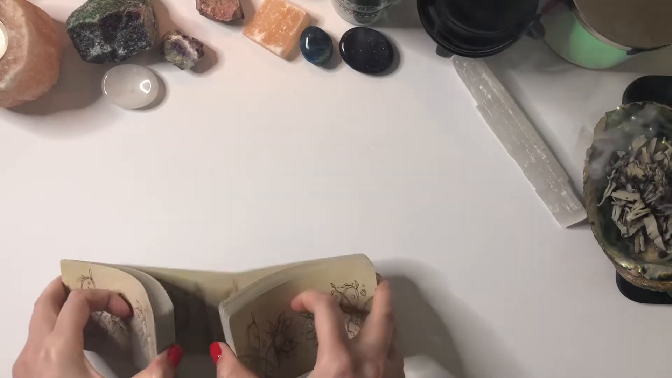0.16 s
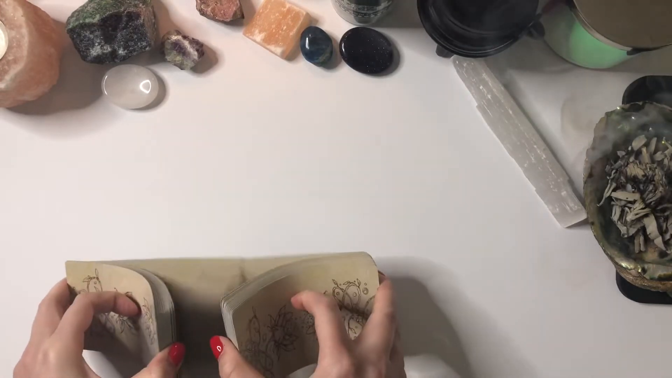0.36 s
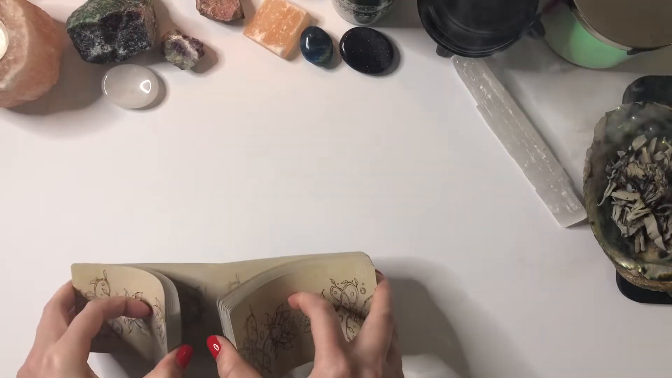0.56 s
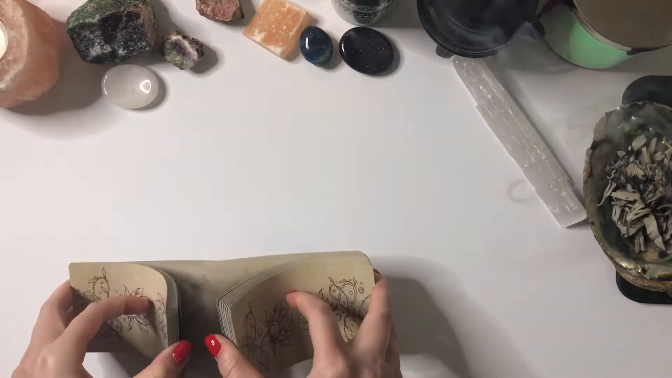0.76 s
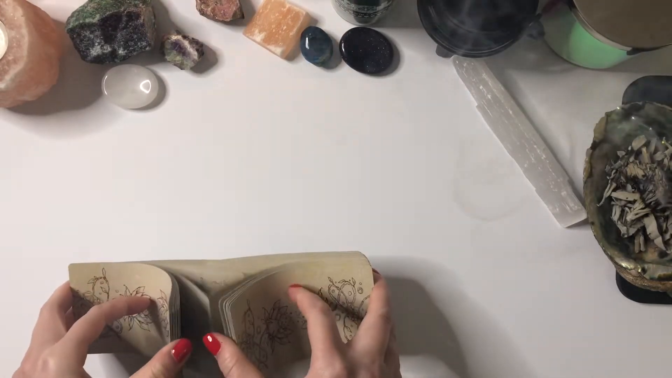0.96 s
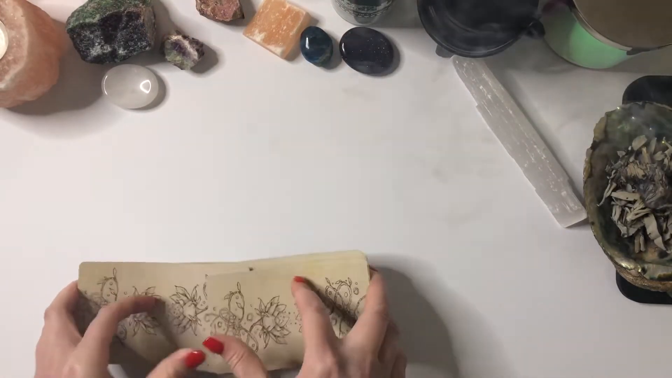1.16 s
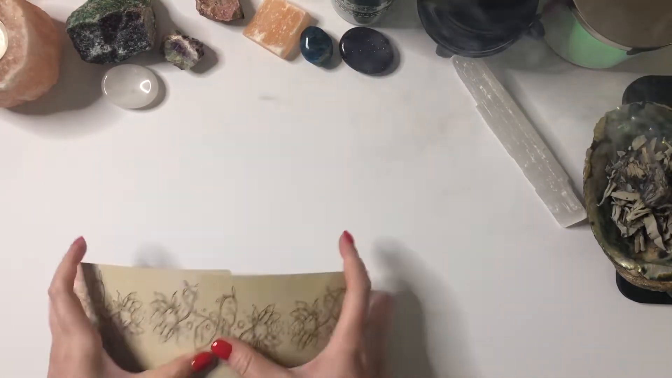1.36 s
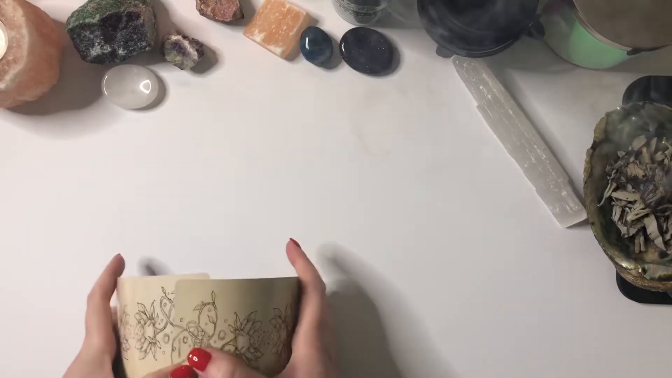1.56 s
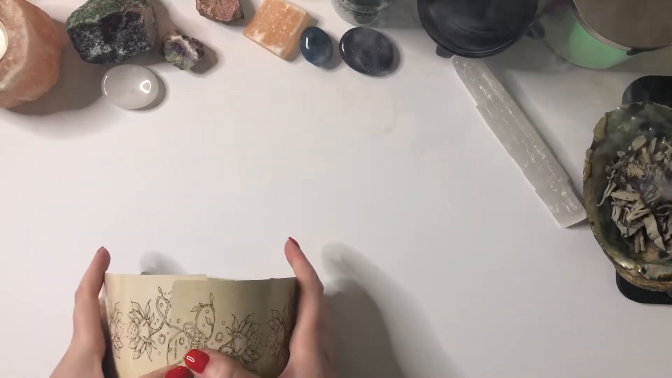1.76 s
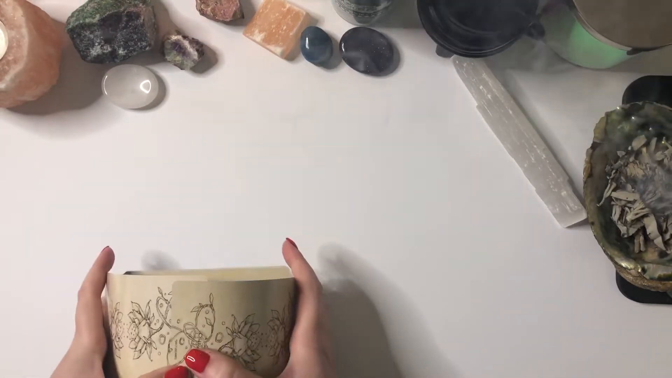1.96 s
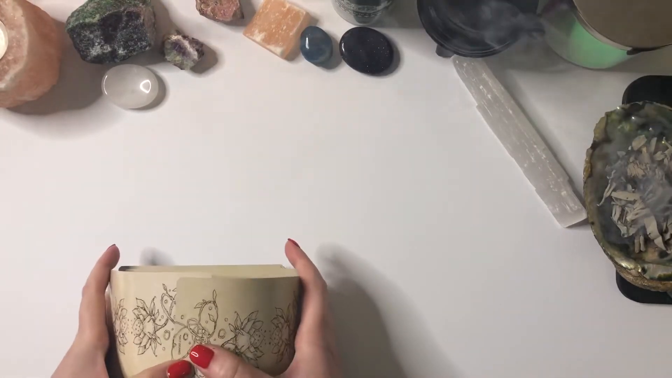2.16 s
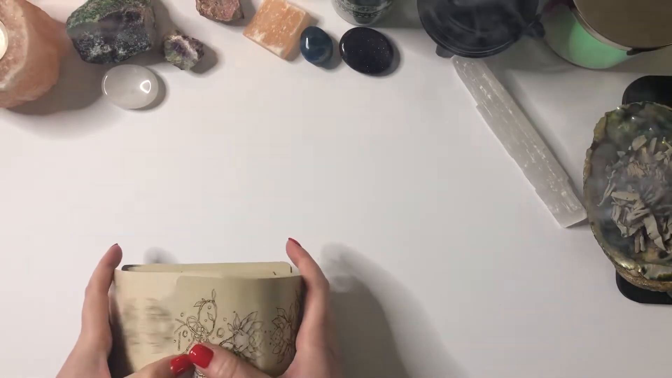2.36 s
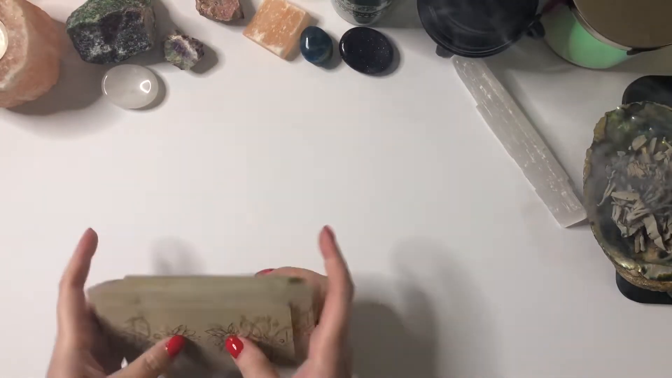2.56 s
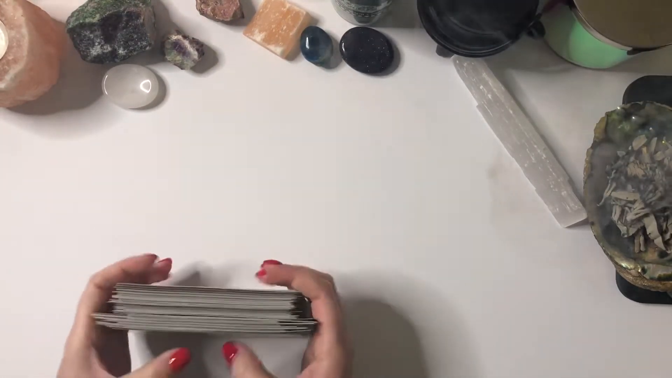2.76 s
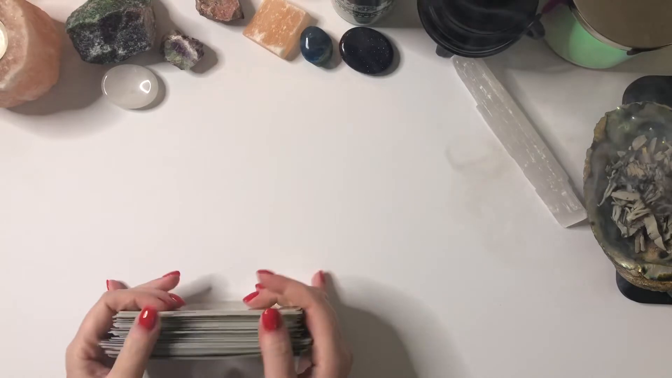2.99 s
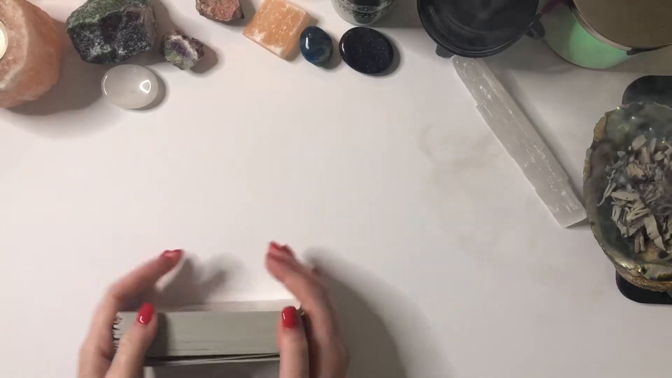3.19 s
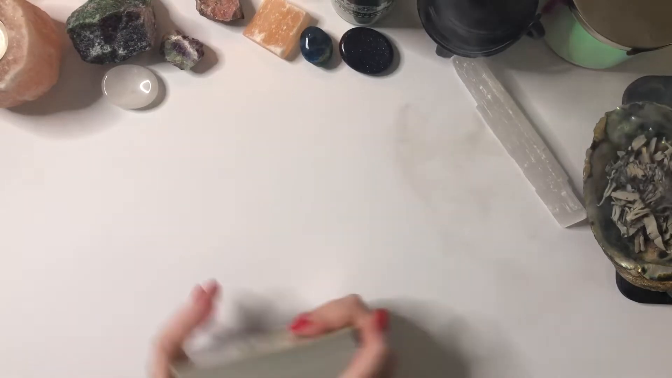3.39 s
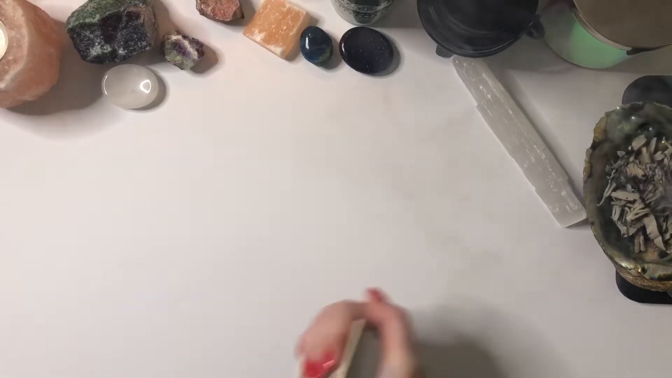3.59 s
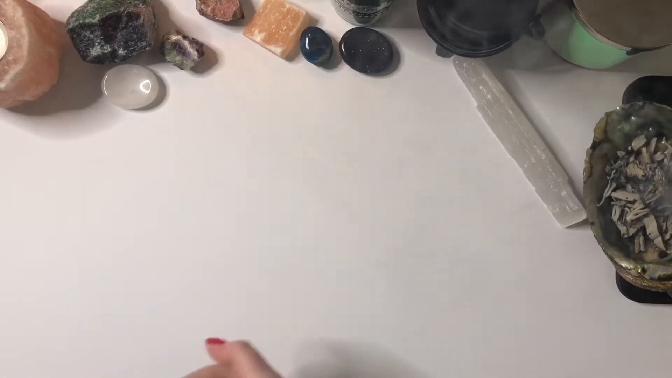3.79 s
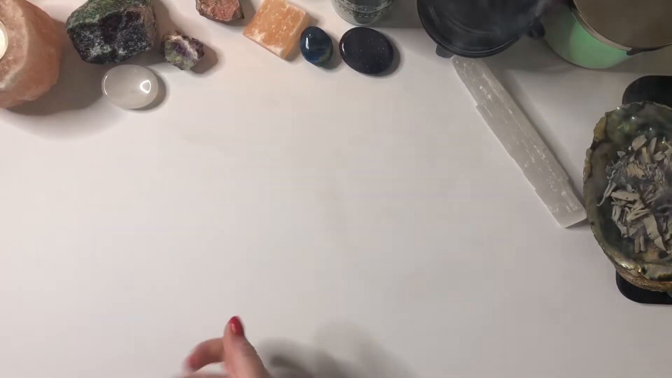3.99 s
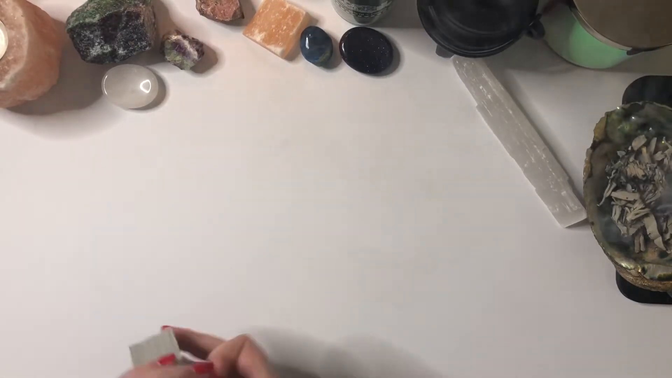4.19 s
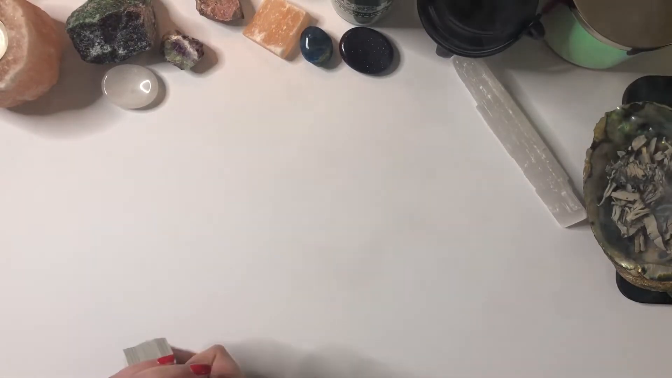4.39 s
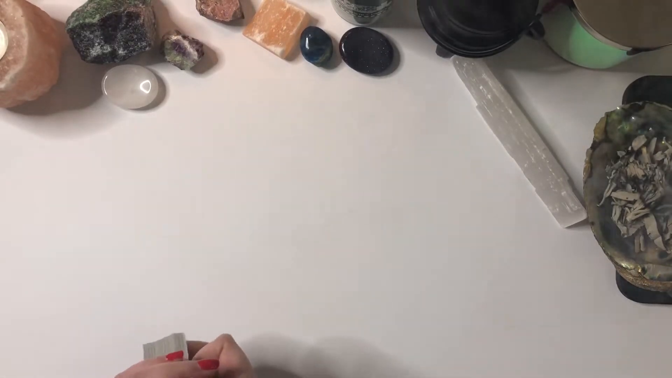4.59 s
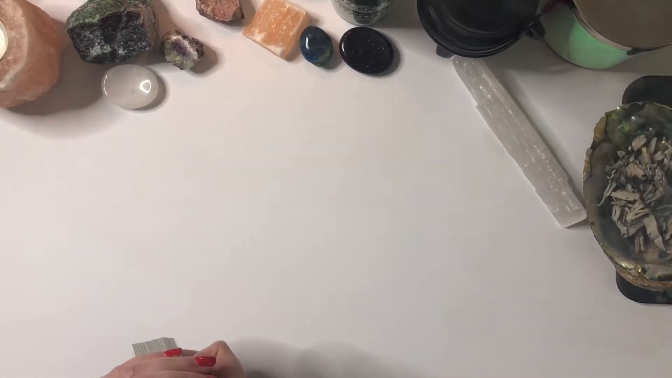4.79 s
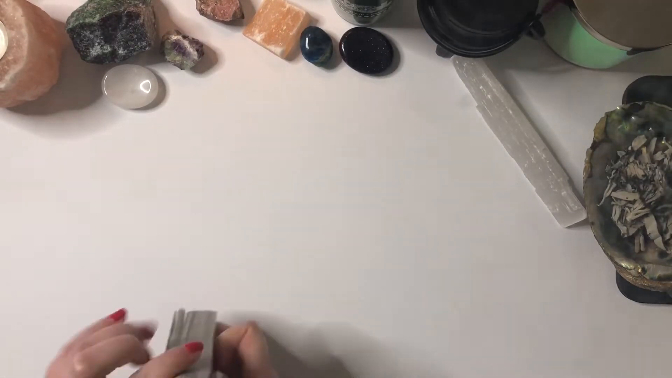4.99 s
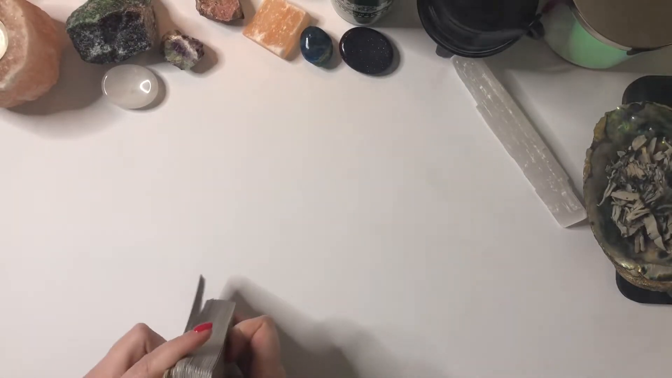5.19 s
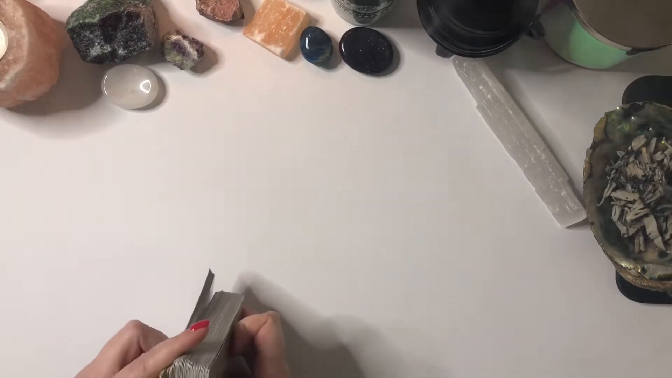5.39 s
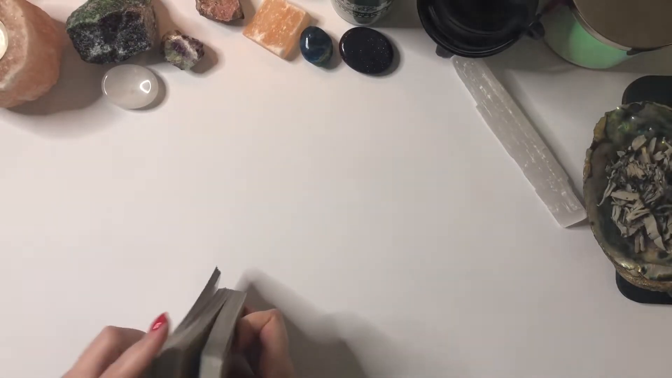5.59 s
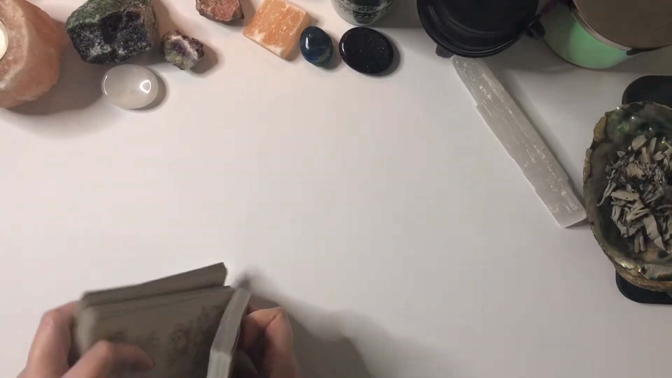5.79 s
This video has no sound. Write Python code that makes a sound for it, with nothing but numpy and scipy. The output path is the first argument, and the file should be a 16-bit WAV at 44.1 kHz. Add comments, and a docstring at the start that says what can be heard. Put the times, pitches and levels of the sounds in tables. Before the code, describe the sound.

A deck of cards is shuffled by hand on a hard table: dry ticks and snaps, a quick crackling burst, a brief soft gap, then a hissing papery cascade. The deck's edge drops twice with a dull knock and card clatter. Afterwards it is nearly silent, with tiny brushing and light handling. Close microphone, short room echo, very faint low steady noise.

```python
"""Cards snap off the thumbs, singly and then in a rush: a deck is riffled on a table in a small bare room.
The woven deck is bent into a bridge and slithers together, is dropped twice on its edge to square it,
and after a pause is handled softly and cut again. Contacts are short noise bursts with one broad ring;
slides are grainy friction noise. Table resonances, wall echoes and a faint steady noise lie behind."""
import sys
import numpy as np
from scipy import signal
from scipy.fft import rfft, irfft, next_fast_len
from scipy.io import wavfile

SR = 44100
rng = np.random.default_rng(int(sys.argv[2]) if len(sys.argv) > 2 else 0)


def persist_wave(psi):
    """Save psi, clipped to +-1, as 16-bit WAV."""
    counts = np.round(np.clip(psi, -1, 1) * 32767).astype(np.int16)
    wavfile.write(sys.argv[1], SR, np.atleast_2d(counts).T)


N = 257984

# cards or fingers meet the table: start_s, body_db, crack_db, tick_db, pack_ring_hz (relative levels)
KNOCK_EVENTS = [(0.018, -43, -55, -66.5, 264), (1.437, -40, -56, -73, 312), (1.503, -29, -59, -71.5, 444),
                (1.598, -40.5, -57, -72, 218), (2.7486, -30.5, -31.5, -54.5, 1098),
                (2.7603, -24.5, -35, -59, 350), (2.7808, -30, -25, -35.5, 229.7),
                (2.796, -28.5, -18.5, -31, 1243), (2.805, -19, -17, -27.5, 472),
                (2.820, -20, -21.5, -33.5, 481), (2.946, -34, -31, -58, 312.3),
                (3.001, -36, -45, -75.5, 1200), (3.059, -35, -32, -65, 1273),
                (3.065, -25, -34.5, -54.5, 469), (3.0792, -29.5, -22, -37.5, 1380),
                (3.0845, -23.5, -15, -25, 3300), (3.089, -19.5, -16, -30.5, 484),
                (4.298, -60.5, -71, -75.5, 201), (5.2502, -37.5, -49.5, -66.5, 444),
                (5.281, -48.5, -45, -70, 600), (5.447, -44.5, -52, -76, 237),
                (5.574, -43.5, -62.5, -70.5, 343), (5.693, -42.5, -50.5, -61, 269),
                (5.728, -43, -47, -65.5, 271)]
# bands of body, crack (or rasp) and tick (or hiss): low_hz, high_hz
BAND_EDGES_HZ = [(50, 1000), (1000, 4500), (4500, 18000)]
# spectrum of card sliding on card or skin: freq_hz, density_db_per_hz (relative)
SLIDE_SPECTRUM = [(59, -47), (100, -10), (135, -7), (255, -4), (513, -10), (558, -9.5), (1330, 0),
                  (1550, 3), (2270, -4.5), (3700, -6), (5770, -6.5), (8110, -7.5), (15000, -13),
                  (16000, -22.5)]


def from_db(db):
    """Amplitude ratio of a level in dB."""
    return 10 ** (np.asarray(db) / 20)


def rms_one(x):
    """Scales a signal to rms 1."""
    return x / np.sqrt(np.mean(x ** 2) + 1e-20)


def at_hz(points, hz, axis=1):
    """Reads one column of a table on a log-frequency axis."""
    points = np.array(points)
    return np.interp(np.log(np.maximum(hz, 1)), np.log(points[:, 0]), points[:, axis])


def band(x, edges_hz):
    """Butterworth band-pass."""
    return signal.sosfilt(signal.butter(2, edges_hz, "band", fs=SR, output="sos"), x)


def colour(x, spectrum):
    """Causal (minimum-phase) filter with the given spectrum."""
    n = x.shape[-1]
    size = next_fast_len(n) * 2
    magnitude = from_db(at_hz(spectrum, np.fft.rfftfreq(size, 1 / SR)))
    cepstrum = irfft(np.log(magnitude))
    # folding the cepstrum onto positive time gives minimum phase
    cepstrum[1:size // 2] *= 2
    cepstrum[size // 2 + 1:] = 0
    return irfft(rfft(x, size) * np.exp(rfft(cepstrum)))[..., :n]


def resonance(x, hz, width_hz):
    """Two-pole resonance with gain 1 on top."""
    r = np.exp(-np.pi * width_hz / SR)
    numerator = np.array([1, 0, -1]) * (1 - r * r) / 2
    denominator = [1, -2 * r * np.cos(2 * np.pi * hz / SR), r * r]
    return signal.lfilter(numerator, denominator, x + 1e-18)


def stroke(start_s, length_s, attack_s, release_s):
    """A movement gathers speed up to its start, holds, then dies away."""
    t = np.arange(N) / SR - start_s
    attack = np.clip(1 + t / attack_s, 0, 1)
    return attack * np.exp(-np.maximum(t - length_s, 0) / release_s)


def gains(rows, attack_s, release_s):
    """Gain in time for each dB column of a table of strokes."""
    return sum(np.outer(from_db(dbs), stroke(start_s, length_s, attack_s, release_s))
               for start_s, length_s, *dbs in rows)


def swells(rows):
    """Gain in time of short, rounded swells."""
    t = np.arange(N) / SR
    return sum(from_db(db) * np.exp(-(2 * (t - centre_s) / width_s) ** 2) for centre_s, width_s, db in rows)


def contacts(rows, base_decay_s, spectrum, rise, evenness, stretches, offsets_db, ring_db):
    """Each contact is a burst of paper noise a millisecond or so long; its bending body dies more slowly."""
    size, ring_q = 2048, 3.5
    rows, t = np.array(rows), np.arange(size) / SR
    noise = rng.standard_normal((len(rows), 3, size))
    # the free length of card sets one broad resonance
    ratio = np.maximum(np.fft.rfftfreq(size, 1 / SR), 1) / rows[:, -1:]
    ring = 1 + from_db(ring_db) / (1 + 1j * ring_q * (ratio - 1 / ratio))
    out, span = np.zeros(N + size), 5 * SR / 1000
    for k, stretch in enumerate(stretches):
        decay_s = base_decay_s * stretch
        shape = (1 - np.exp(-t / (rise * decay_s))) * np.exp(-t / decay_s)
        # partly even out the noise partials, so that each burst varies less by chance
        partials = rfft(noise[:, k] * shape)
        evened = partials / abs(partials) ** evenness
        bursts = irfft(ring * evened) * np.exp(-(t / (6 * decay_s)) ** 2)
        bursts = band(colour(bursts, spectrum), BAND_EDGES_HZ[k])
        bursts /= np.sqrt(np.sum(bursts ** 2, axis=1, keepdims=True) / span)  # energy of 5 ms at rms 1
        for start_s, db, burst in zip(rows[:, 0], rows[:, 1 + k], bursts):
            i = int(np.clip(start_s * SR, 0, N - 1))
            out[i:i + size] += from_db(db + offsets_db[k]) * burst
    return out[:N]


def one_by_one(runs, count=56):
    """Cards go at uneven gaps, each with its own strength and ring; those after the end of a run are silent."""
    gap_spread_log, strength_spread_db = 0.45, 5.5
    ring_low_hz, ring_high_hz = 1200, 4550
    out = []
    for start_s, end_s, per_s, *dbs in runs:
        luck = np.clip(rng.standard_normal((count, 2)), -2, 2)
        gaps_s = np.exp(gap_spread_log * luck[:, 0]) / per_s
        times_s = start_s + np.cumsum(gaps_s) - gaps_s[0]
        levels_db = np.array(dbs) + strength_spread_db * luck[:, 1:2]
        levels_db[times_s > end_s] = -np.inf
        ring_hz = ring_low_hz * (ring_high_hz / ring_low_hz) ** rng.random(count)
        out.extend(np.column_stack([times_s, levels_db, ring_hz]))
    return out


def card_snaps(rows, base_decay_s):
    """A card edge springs off the thumb and slaps the pile."""
    # freq_hz, density_db_per_hz (relative)
    snap_spectrum = [(50, -31), (100, -13.5), (160, -16.5), (220, -5), (500, -8.5), (950, -4), (1800, -4.5),
                     (2600, -4), (4500, -4.5), (5600, -8), (7200, -5.5), (16000, -9.5)]
    crack_db, ring_hz = np.array(rows)[:, 2:3], np.array(rows)[:, -1:]
    # a thicker bunch cracks louder and takes longer to land: 0.22 dB of length per dB
    bunch = from_db(0.22 * np.maximum(crack_db + 30.5, 0))
    # a card held short rings higher and its snap is over sooner
    stiffness = np.maximum(ring_hz / 3000, 1) ** 0.47
    return contacts(rows, base_decay_s * bunch / stiffness, snap_spectrum, rise=0.49, evenness=0.52,
                    stretches=(2.5, 1.25, 0.9), offsets_db=(-3, 0.2, 0.5), ring_db=3.5)


def pack_knocks(rows):
    """Card edges land on the table."""
    # freq_hz, density_db_per_hz (relative)
    knock_spectrum = [(50, -47.5), (100, -15.5), (160, -12), (220, 4), (450, -4), (700, -7.5), (900, -5),
                      (1300, -12), (1900, -16), (3100, -18.5), (6000, -27.5), (9400, -27), (16000, -48.5)]
    return contacts(rows, 0.002, knock_spectrum, rise=0.17, evenness=0.37,
                    stretches=(2.4, 1.5, 1.2), offsets_db=(-1.5, -1.5, -1.5), ring_db=9.0)


def weight(lowest_hz):
    """The mass behind each knock gives the table one short push; the slowest part of it radiates no sound."""
    rows, pushes = np.array(KNOCK_EVENTS), np.zeros(N)
    pushes[np.clip(rows[:, 0] * SR, 0, N - 1).astype(int)] = from_db(rows[:, 1])
    return signal.sosfilt(signal.butter(2, lowest_hz, "high", fs=SR, output="sos"), pushes)


def friction(per_s, spread_db, grain_s, smooth):
    """Fibres catch and slip: tiny bursts of uneven size over a smooth hiss."""
    sizes = from_db(spread_db * np.minimum(rng.exponential(1, N), 3.5))
    slips = (rng.random(N) < per_s / SR) * sizes
    power = signal.lfilter([1], [1, -np.exp(-2 / (grain_s * SR))], slips ** 2 + 1e-18)
    return rng.standard_normal(N) * np.sqrt(smooth + power / power.mean())


def patter(per_s, spread_db, low_hz, high_hz, width, count=14):
    """Single cards flop onto the pile, each exciting one of a set of damped pitches; rms 1."""
    flops = (rng.random(N) < per_s / SR) * from_db(spread_db * rng.uniform(-1.6, 1, N))
    dealt = rng.integers(0, count, N)
    pitches_hz = np.geomspace(low_hz, high_hz, count)
    return rms_one(sum(resonance(flops * (dealt == k), hz, width * hz) / np.sqrt(hz)
                       for k, hz in enumerate(pitches_hz)))


def sliding():
    """Strength of rasp and hiss: single slides, and the cascade of the bridge with its surges."""
    # packets slide over each other, briskly or creeping in the grip: start_s, length_s, rasp_db, hiss_db
    slide_events = [(0.42, 0.049, -51.5, -55), (1.03, 0.086, -38, -49), (1.2, 1.48, -56, -66.5),
                    (1.302, 0.027, -43.5, -57), (1.505, 0.036, -53.5, -53), (2.62, 0.01, -56, -74)]
    # the grip eases and a bunch of cards lets go with a hiss: centre_s, width_s, level_db
    surge_events = [(1.63, 0.018, -39), (1.75, 0.25, -43), (2.005, 0.042, -32.5), (2.25, 0.029, -34.5),
                    (2.39, 0.066, -41), (2.467, 0.04, -28.5)]
    rasp, hiss = gains(slide_events, attack_s=0.0084, release_s=0.017)
    # the bent deck cascades at an even pace, rasping more as the pile grows
    bridge_start_s, growth_db_per_s = 1.634, 10
    bridge = stroke(bridge_start_s, length_s=0.865, attack_s=0.057, release_s=0.005)
    growth_db = growth_db_per_s * (np.arange(N) / SR - bridge_start_s)
    rasp = rasp + bridge * from_db(-49 + growth_db)
    hiss = hiss + bridge * from_db(-43) + swells(surge_events)
    return rasp, hiss


def slither():
    """Cards slide into each other at the end of the riffle and under the bridge, their edges fluttering."""
    rasp, hiss = sliding()
    flutter = colour(friction(per_s=330, spread_db=2.5, grain_s=0.01, smooth=0.48), SLIDE_SPECTRUM)
    body, middle, top = (rms_one(band(flutter, edges_hz)) for edges_hz in BAND_EDGES_HZ)
    flops = patter(per_s=48, spread_db=6.0, low_hz=654.6, high_hz=3900, width=0.15)
    rasping = from_db(-12) * body + from_db(-5.5) * middle + from_db(-13.0) * flops
    return rasp * rasping - from_db(-6.0) * hiss * top


def rubbing():
    """The edge of the deck drags over the table in a fine, close-grained scrape."""
    # deck pushed over the table or turned in the hands: start_s, length_s, drag_db, rasp_db, hiss_db
    rub_events = [(1.586, 0.072, -46, -46.5, -51), (2.843, 0.1, -54, -44.5, -69),
                  (3.03, 0.032, -63, -49, -67), (3.156, 0.071, -65, -53, -69),
                  (3.243, 0.049, -47, -38.5, -61), (3.308, 0.043, -33.5, -42, -69.5),
                  (5.255, 0.034, -47.5, -45.5, -69.5), (5.351, 0.022, -46, -63, -84),
                  (5.586, 0.024, -46, -65, -66.5), (5.737, 0.034, -41, -58, -77)]
    # freq_hz, density_db_per_hz (relative)
    rub_spectrum = [(71, -45), (120, -1), (160, -2), (204, 6.5), (341, 6), (670, -5.5), (1070, -11.5),
                    (1290, -15), (1790, -21), (2070, -26), (16000, -44)]
    grains = colour(friction(per_s=630, spread_db=-3.0, grain_s=0.00066, smooth=0.33), rub_spectrum)
    strengths = gains(rub_events, attack_s=0.014, release_s=0.0067)
    drag, rasp, hiss = (gain * rms_one(band(grains, edges_hz))
                        for gain, edges_hz in zip(strengths, BAND_EDGES_HZ))
    return from_db(-7.5) * drag - from_db(-5.5) * rasp + from_db(-0.5) * hiss


def brushing():
    """Skin wipes over card in short, soft swells."""
    # fingertips brush the cards: centre_s, width_s, level_db
    brush_events = [(3.543, 0.1, -68.5), (3.948, 0.032, -65.5), (4.04, 0.063, -74), (4.12, 0.016, -74.5),
                    (4.312, 0.032, -71.5), (4.452, 0.023, -68.5), (4.768, 0.026, -80.5),
                    (4.987, 0.028, -60.5), (5.203, 0.11, -70.5)]
    grains = friction(per_s=390, spread_db=-2.0, grain_s=0.0018, smooth=1.0)
    return swells(brush_events) * rms_one(colour(grains, SLIDE_SPECTRUM))


def table(x):
    """The table top rings under whatever touches it."""
    # table-top modes: freq_hz, width_hz, gain_db
    table_modes = [(92, 20, -3), (130, 18, -7), (213, 18, 6), (240, 25, 0), (275, 22, -6), (363, 25, -2),
                   (474, 11, 11), (579, 20, -7), (893, 20, -5), (1070, 20, -7), (1220, 25, -6),
                   (1642, 20, -8)]
    return sum(from_db(db) * resonance(x, hz, width_hz) for hz, width_hz, db in table_modes)


def room(x, build_s):
    """Dense wall echoes build up and die away band by band, slowest in the low middle."""
    # freq_hz, reverberant_level_db, t60_s
    room_bands = [(100, 4, 0.2), (250, -4.5, 0.69), (600, -3, 0.18), (1520, -4.5, 0.28), (3500, -7, 0.19),
                  (7000, -7, 0.18), (15000, -12, 0.13)]
    t, echoes = np.arange(SR * 3 // 4) / SR, 0
    edges_hz = np.geomspace(50, 18000, 13)
    for low_hz, high_hz in zip(edges_hz, edges_hz[1:]):
        centre_hz = np.sqrt(low_hz * high_hz)
        decay = from_db(-60 * t / at_hz(room_bands, centre_hz, axis=2))
        tail = band(rng.standard_normal(len(t)), [low_hz, high_hz]) * decay
        tail *= 1 - np.exp(-(t / build_s) ** 2)
        # tail energy in proportion to bandwidth
        level = np.sqrt(2 * (high_hz - low_hz) / SR / np.sum(tail ** 2))
        echoes = echoes + tail * from_db(at_hz(room_bands, centre_hz)) * level
    return signal.fftconvolve(x, echoes)[:N]


def room_air():
    """Faint steady noise, strongest in the bass."""
    # freq_hz, density_db_per_hz (relative)
    air_spectrum = [(15, -46), (25, -9), (166, -6.5), (384, -16), (503, -17.5), (641, -22), (911, -20),
                    (1130, -27), (1400, -23.5), (1790, -26.5), (16000, -37.5)]
    return from_db(-68.5) * rms_one(colour(rng.standard_normal(N), air_spectrum))


def scene():
    """Snaps face the listener; knocks sound behind the hands and come more by way of the walls."""
    # clearest card edges flicking free: start_s, body_db, crack_db, tick_db, card_ring_hz (relative levels)
    snap_events = [(0.1218, -53.5, -55, -67, 810), (0.165, -45, -43.5, -47, 2230),
                   (0.1779, -34, -38.5, -35.5, 1920), (0.1872, -31.5, -34, -38, 1860),
                   (0.2742, -40, -42, -43, 4300), (0.2871, -36, -50, -36.5, 3680),
                   (0.3052, -44, -36, -37.5, 4200), (0.3805, -41, -42, -40.5, 1470),
                   (0.4005, -29.5, -20, -28.5, 4950), (0.4565, -38.5, -36.5, -40, 3350),
                   (0.569, -52, -61, -54, 3940), (0.5917, -30.5, -36.5, -62, 880),
                   (0.6252, -44, -46, -58, 1190), (0.6571, -36, -41, -65, 740),
                   (0.7173, -44, -43, -51, 1600), (0.7364, -39, -52, -46, 1660),
                   (0.755, -30, -28, -31, 4200), (0.817, -41, -40, -42, 1570),
                   (0.843, -31, -29.5, -34, 2630), (0.8538, -35.5, -46, -28.5, 7700),
                   (0.9036, -31, -35, -63, 1450), (0.9213, -34.5, -50, -35.5, 1040),
                   (0.9462, -35, -37.5, -36.5, 4700), (0.972, -41, -31.5, -17.5, 6750),
                   (0.986, -32, -32, -47, 6540), (1.0206, -35, -16, -26, 2790),
                   (1.0255, -35, -20, -27, 2540), (1.0755, -26, -22, -24, 12300),
                   (1.1011, -25.5, -14.5, -21.5, 2400), (1.123, -33.5, -27.5, -51, 2630),
                   (1.1435, -35.5, -34, -29, 4630), (1.1592, -36.5, -43, -45, 1530),
                   (1.1697, -39, -33.5, -36, 2850), (1.3085, -43, -61, -44.5, 1070),
                   (1.3787, -48, -45, -46, 2230), (1.541, -37, -32.5, -45, 1610),
                   (1.8248, -34.5, -40, -55, 1490), (1.8435, -30.5, -57, -57, 1440),
                   (1.8749, -28.5, -41, -57, 1090), (1.907, -44, -33, -38.5, 1700),
                   (2.017, -49, -36.5, -42, 2340), (2.1215, -43, -40.5, -40, 1760),
                   (2.1615, -46, -32, -39, 1560), (2.1946, -70, -30, -34.5, 3700),
                   (2.2308, -70, -33, -37, 3800), (2.308, -58, -32, -33, 2470),
                   (2.3253, -55, -32.5, -50, 2700), (2.355, -43, -33.5, -57, 1950),
                   (2.4361, -43, -38, -32.5, 2500), (2.4617, -47, -33, -32.5, 2070),
                   (2.5404, -48, -41, -39.5, 9100), (2.6141, -51.5, -44, -62, 2840),
                   (4.3625, -66, -61.5, -66.5, 2887), (5.2273, -53.5, -50.5, -53.5, 2784),
                   (5.6144, -60, -55, -60, 756), (5.631, -68.5, -63.5, -68.5, 2500),
                   (5.8471, -42.5, -39.5, -55, 1570)]
    # lesser cards off the thumbs (slow riffle, rush, bridge):
    # start_s, end_s, cards_per_s, body_db, crack_db, tick_db (mean relative levels)
    card_runs = [(0.2, 1.0, 52, -47, -52.5, -55), (1.03, 1.17, 99.6, -37.5, -43, -37),
                 (1.76, 2.49, 67, -53, -44, -54)]
    # loose cards clatter down each time the deck is dropped on its edge: same columns as card_runs
    clatter_runs = [(2.79, 2.832, 170, -34.5, -29.5, -44.5), (3.066, 3.094, 220, -39.5, -24.5, -48)]
    snaps = card_snaps(snap_events, base_decay_s=0.0014)
    snaps = snaps + card_snaps(one_by_one(card_runs), base_decay_s=0.0025)
    knocks = pack_knocks(KNOCK_EVENTS) + pack_knocks(one_by_one(clatter_runs))
    rubs = rubbing()
    slides = slither() + brushing()
    to_table = from_db(32.5) * weight(lowest_hz=108) + from_db(-3.5) * snaps
    to_table = to_table + from_db(-1) * rubs + from_db(-7) * knocks
    top = table(to_table)
    to_walls = from_db(-3.0) * snaps + from_db(-7.0) * slides + knocks
    to_walls = to_walls + from_db(-1.0) * rubs + from_db(-12.5) * top
    walls = room(to_walls, build_s=0.0064)
    return (snaps + knocks + top + rubs + slides + walls + room_air())[None]


def record(dry):
    """The top is cut steeply above 16.3 kHz."""
    return signal.sosfilt(signal.ellip(10, 0.1, 80, 16300, fs=SR, output="sos"), dry)


dry = scene()
out = record(dry)
persist_wave(out)
```